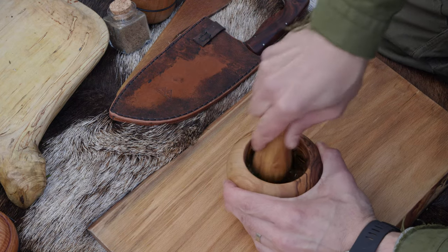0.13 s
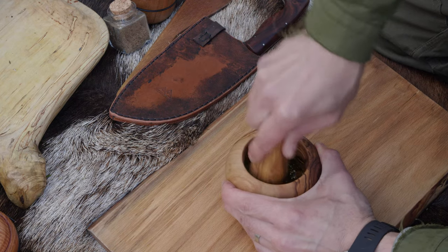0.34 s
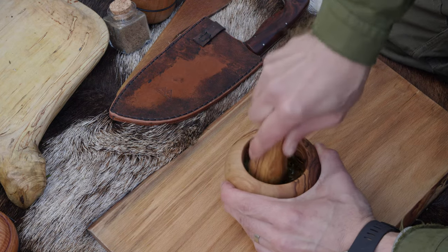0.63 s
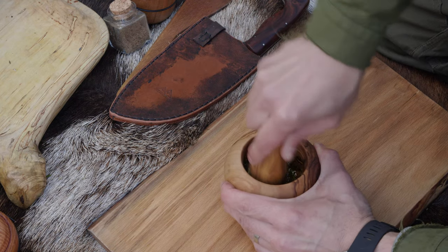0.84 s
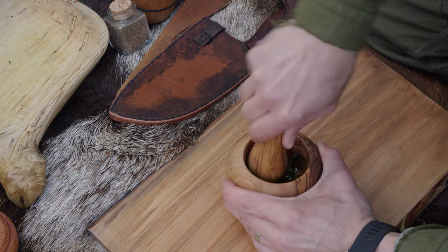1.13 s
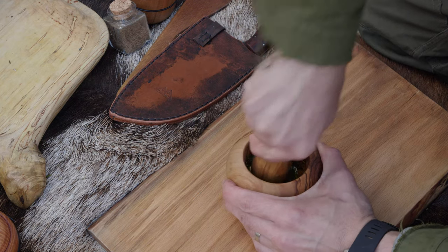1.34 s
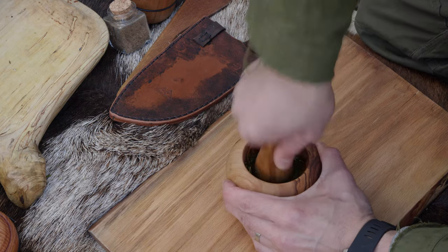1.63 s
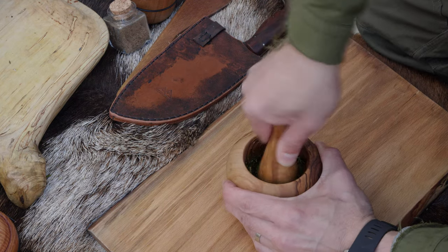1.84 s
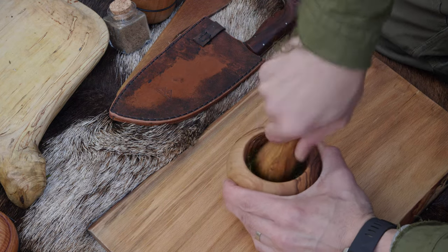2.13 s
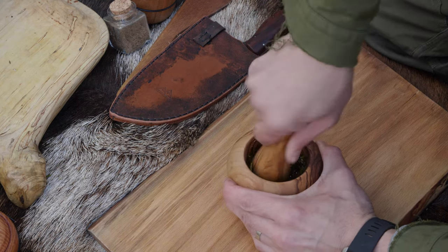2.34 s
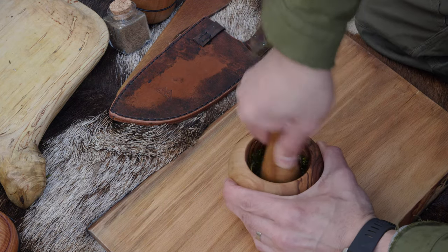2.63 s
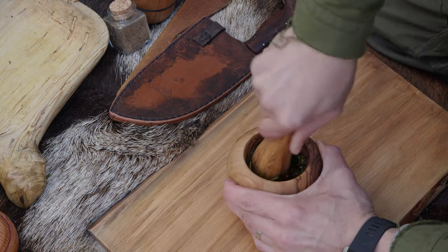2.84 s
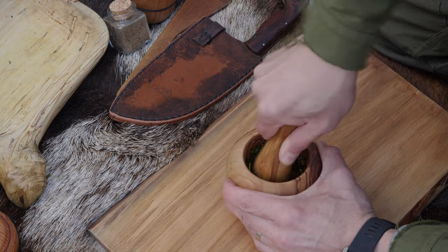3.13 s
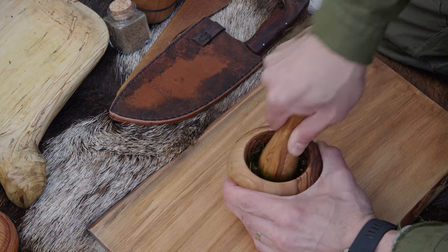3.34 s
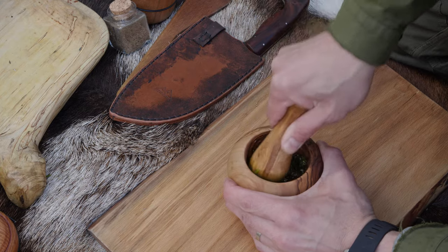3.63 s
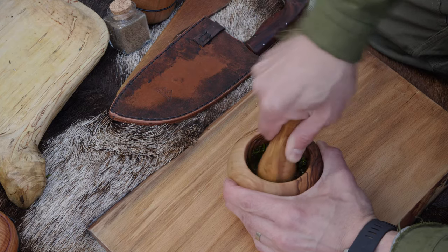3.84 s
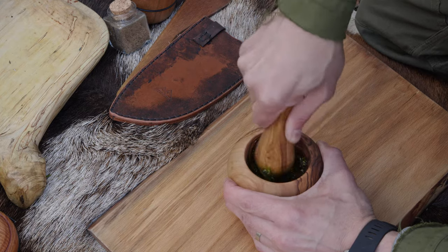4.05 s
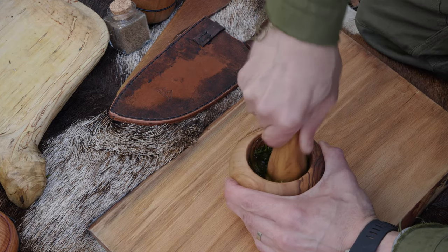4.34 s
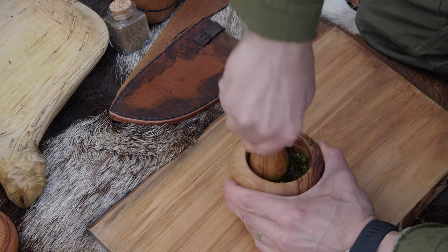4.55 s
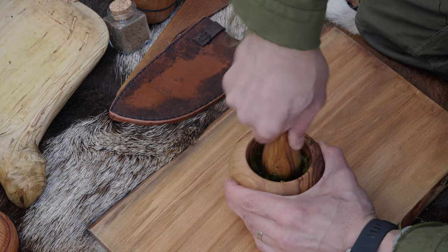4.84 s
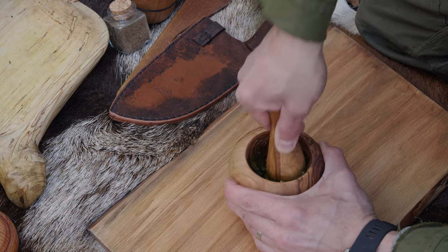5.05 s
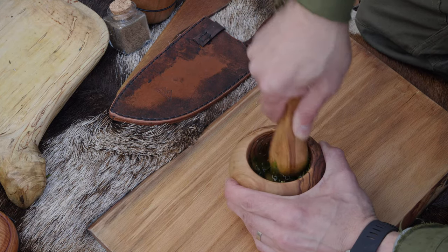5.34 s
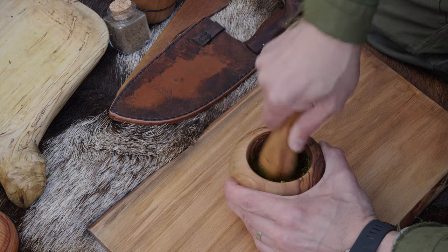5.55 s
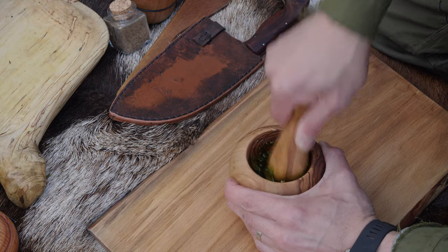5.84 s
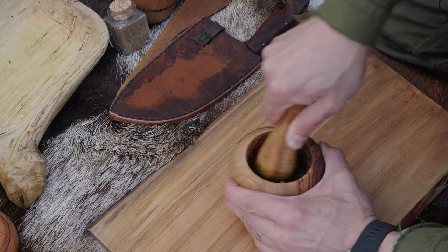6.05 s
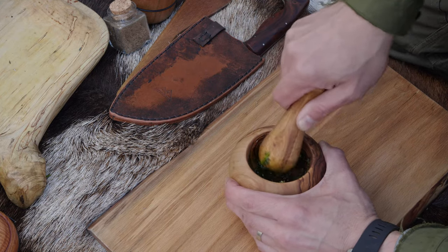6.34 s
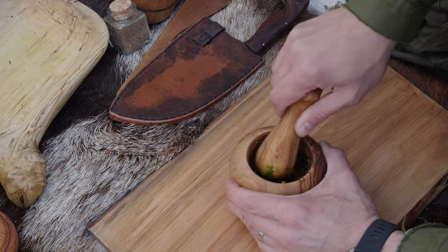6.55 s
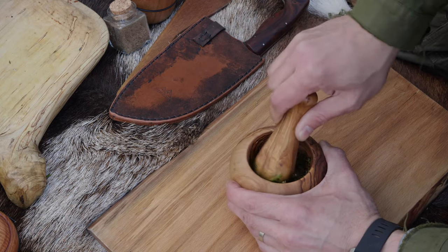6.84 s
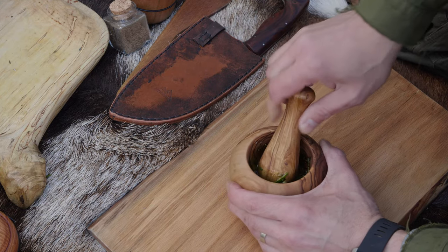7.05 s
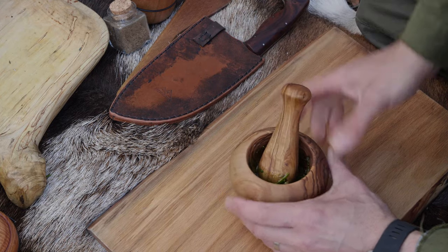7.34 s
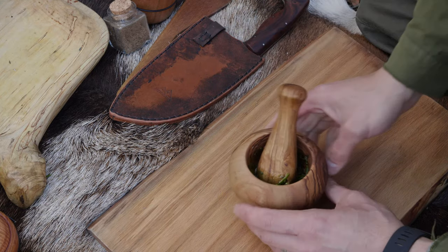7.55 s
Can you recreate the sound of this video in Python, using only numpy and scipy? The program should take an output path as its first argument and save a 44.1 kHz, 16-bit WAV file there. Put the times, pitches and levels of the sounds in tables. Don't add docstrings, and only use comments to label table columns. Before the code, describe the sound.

Short, dry, woody thuds and hollow bowl knocks come in uneven flurries, mixed with leaf crunch, stem snaps and tiny grit ticks. Rough grinding rumbles through the wood between hits. After several bursts and quieter rubbing, a heavy blow and then a bright double knock on the rim finish the work. Close stereo microphone outdoors, no room echo, soft steady airy hiss around it.

```python
import sys
import numpy as np
from scipy import signal
from scipy.io import wavfile

SR = 44100
rng = np.random.default_rng(int(sys.argv[2]) if len(sys.argv) > 2 else 0)


def digitize_waveform(pressure):
    field = np.atleast_2d(pressure).T
    bounded = np.clip(field, -1, 1)
    quanta = np.round(bounded * 32767).astype(np.int16)
    wavfile.write(sys.argv[1], SR, quanta)


def rack_gain(trim_db):
    fader = np.asarray(trim_db, float)
    return 10 ** (fader / 20)


N = 338685

# [f/Hz, level per Hz/dB]
AIR_COLOUR = [(15, -66), (25, -10.5), (87, -1), (245, -11), (410, -10.5), (445, -11.5), (584, -12.5),
              (902, -10.5), (1060, -15), (1780, -13), (4600, -25), (14400, -34.5), (16500, -22)]
# [f/Hz, likeness 0 to 1]
AIR_LIKENESS = [(28, 1.0), (60, 0.75), (240, 0.61), (950, 0.62), (3770, 0.46), (15000, 0.024)]
# [f/Hz, left over right/dB]
AIR_LEAN = [(28, -6), (60, -5.5), (240, -4.5), (950, -4.0), (3770, -5), (15000, -0.5)]

# [f/Hz, level/dB, t60/s]
THUD_MODES = [(161, -19, 0.13), (230, -2.5, 0.021), (247.5, 5, 0.039)]
BOARD_MODES = [(382.6, -1.5, 0.049), (432, -2.5, 0.016), (522, -6.5, 0.043)]
BOWL_MODES = [(635, -21, 0.058), (735, -0.5, 0.033), (750, -23, 0.0087)]
WALL_MODES = [(985, -6.5, 0.025), (1029, 0, 0.038)]
RIM_MODES = [(1296, -7.5, 0.04), (1426, -17, 0.063)]
EDGE_MODES = [(1500, 16, 0.0038), (1850, -4, 0.027), (2126, 6, 0.0072), (2570, -2, 0.0085)]
PESTLE_MODES = [(3500, -3, 0.013), (7800, -3, 0.012)]

# [t/s, push/dB, ring/dB, hardness/dB]
SHOVES = [(0.24, -40, -45.5, -3.5), (0.448, -39, -66, 0.5), (0.767, -33, -41, -8), (0.8711, -32, -38, -22),
          (1.0299, -44, -72, -3), (2.0138, -40, -41.5, -5.5), (2.2328, -58, -36, -10.5),
          (2.249, -63, -35.5, -4.5), (2.4362, -36.5, -62.5, 6), (2.583, -38, -41, -9),
          (2.6436, -34, -36, -2), (2.6712, -48, -45, -4), (3.2402, -44, -39, -9), (3.294, -41, -43, -5),
          (4.3213, -44, -72, 8), (4.3825, -41.5, -69, 5), (5.0319, -41, -61, 1), (5.4948, -48, -48, -1.5),
          (5.966, -27, -39.5, -7), (6.037, -38, -68, 5)]
# [t/s, push/dB, ring/dB, hardness/dB]
NUDGES = [(0.3437, -51, -32, -33), (0.6168, -37.5, -40.5, -28), (0.857, -47, -54, -17),
          (1.429, -74, -45.5, -3.5), (1.8282, -66, -42, -7), (1.9125, -50, -43.5, -22),
          (2.1638, -55, -43, -6), (2.338, -51, -49, -5), (2.602, -37, -63, -9), (2.7046, -77, -46, -8),
          (2.9571, -57, -46, -4), (3.26, -47, -44, -17), (3.329, -47.5, -52, -2), (4.0751, -54.5, -55, -23),
          (5.4675, -47, -47, -6), (5.5228, -43, -38.5, -5.5), (5.609, -47.5, -66, -8),
          (5.6247, -48, -61, -17), (6.013, -47, -69, 8), (6.0505, -52, -66, -5), (6.849, -56, -75, -16)]
# [t/s, push/dB, ring/dB, hardness/dB]
RAPS = [(0.1966, -40.5, -56.5, 9), (0.2923, -46, -49, -9), (0.2975, -24.5, -37.5, -8),
        (0.333, -43, -46, -7), (0.4952, -38.5, -48.5, -0.5), (0.5505, -36.5, -41, -6),
        (0.716, -43.5, -65, 5.5), (0.8242, -35.5, -42.5, -3.5), (0.98, -60, -59, 8),
        (2.1883, -30.5, -58, 7.5), (2.261, -41.5, -41, -11), (2.998, -44, -34, -5), (3.211, -46, -50, -1.5),
        (4.7825, -54, -60, -3), (5.1008, -42.5, -61, 3), (5.415, -34, -35.5, -14), (5.933, -50, -57, -1),
        (6.2504, -37.5, -43, -22)]
# [t/s, push/dB, ring/dB, hardness/dB]
BLOWS = [(0.171, -44, -57, 1), (0.4239, -46, -62, 4), (0.5796, -33.5, -34.5, -8.5), (1.316, -35, -54, 0),
         (3.026, -46, -60, -5), (3.0491, -29.5, -31, -7), (3.086, -71, -43.5, -5), (3.1289, -68, -49, -12),
         (4.624, -38.5, -50, -9), (5.3816, -44, -34.5, -6.5), (6.1918, -26.5, -24, -12.5),
         (7.1195, -52, -76, -13), (7.487, -54, -61, -6)]
# [t/s, push/dB, ring/dB, hardness/dB]
MORE_KNOCKS = [(2.196, -33, -44, -4), (2.216, -55, -47, -6), (2.593, -44, -50, -8), (2.609, -55, -62, -11),
               (2.648, -53, -51.5, 4), (2.676, -54, -58, -4), (5.4229, -39, -49, -12), (5.451, -46, -60, -10),
               (5.475, -44, -61, -10), (5.499, -46, -48, 0.5), (5.6, -39, -61, 0), (5.637, -47, -54, -10)]
# [thud/dB, board/dB, wall/dB]
KNOCK_LOSS = [
    (0.5, -11, -14.5),
    (-9, 3, -11.5),
    (-15, -0.5, -5),
    (1.5, 0, -3.5),
    (-5, -4.5, -10),
]

# [t/s, level/dB, brightness/dB]
STEMS = [(0.1961, -41, -4.5), (0.2824, -54, 2), (0.2957, -43, -1), (0.365, -48, -13), (0.881, -38, -8),
         (0.981, -42.5, -12), (1.312, -45, -2), (1.89, -52, -24), (2.473, -48.5, -17), (2.599, -54, 5),
         (2.643, -39.5, -18), (3.2027, -46, -21), (4.001, -48, -20), (4.618, -52, -11), (5.424, -58.5, 16),
         (5.523, -53, -14), (6.014, -45.5, -20), (6.506, -45, -22), (6.671, -44, -10), (6.683, -61, -21)]
# [t/s, level/dB, brightness/dB]
TICKS = [(0.127, -58, -11), (0.5009, -33.5, -8), (0.554, -40.5, 0), (0.5797, -50, -1), (0.7033, -44.5, 1),
         (0.868, -39.5, -9), (2.1615, -49, 4), (2.2, -58, -7), (2.7852, -54, -9), (2.794, -49.5, -8),
         (2.9967, -42.5, -2), (3.3274, -53, -12), (4.205, -55, 2), (4.286, -49, 2), (4.547, -35.5, 2),
         (4.788, -50, -2), (5.1014, -52, 4), (5.38, -67, -11), (5.477, -55, 5)]
# [t/s, level/dB, brightness/dB]
LEAVES = [(0.171, -45.5, -15), (0.238, -45.5, -7), (0.342, -41.5, -1), (0.8262, -46.5, -2),
          (1.429, -47, -4), (1.6813, -52, -8), (1.7826, -53, -2), (2.0094, -40.5, -10), (2.189, -43, -4),
          (2.233, -52, 10), (2.2489, -48, -10), (2.671, -53, -18), (3.0154, -68, 9), (3.048, -38.5, -3),
          (3.21, -57, -10), (3.2369, -37, -2), (4.443, -58, 9), (5.0144, -59, -10), (5.16, -56, -2),
          (5.932, -53, 6), (5.9576, -53, 2), (6.19, -43.5, 3), (6.847, -61, -4), (6.982, -48, 0)]
# [t/s, level/dB, middle/dB, brightness/dB]
CRACKLES = [(0.0273, -45, -4, -6), (0.0887, -52, -4, -6), (0.261, -42, -3, -6), (0.3934, -53, -3, -6),
            (0.401, -53, -5, -8), (0.425, -42, -9, -11), (0.4718, -46, -9, -6), (0.601, -56, -5, -6),
            (0.613, -45, -1, -6), (0.6274, -45.5, -5, -6), (0.6324, -49, -3, -6), (0.6679, -45, -13, -12),
            (0.7642, -43.5, -7, -10), (0.9148, -42, -9, -6), (0.9552, -44, -5, -6), (1.0196, -43, -8, -6),
            (2.217, -49, 1, -6), (2.385, -53, 0, -6), (2.4079, -56, -5, -6), (2.4309, -43.5, -2, -6),
            (2.5147, -48, -4, -6), (2.6104, -53, -5, -6), (2.6474, -40, -2, -11), (2.8464, -49, 0, 3),
            (2.9567, -60, -5, -6), (3.0214, -55, -3, -6), (3.055, -40, -14, -13), (3.083, -46, -4, -8),
            (3.126, -40, -5, -6), (3.2278, -53, -3, -2), (3.2574, -54, 3, -6), (3.2999, -43, -5, -11),
            (3.3144, -54, -5, -6), (3.3844, -50, -0.5, -9), (5.4969, -52, -11, -6), (5.6446, -45, -4, -11)]
# [t/s, level/dB, f/Hz]
POPS = [(0.0, -43, 244), (0.0, -44, 373), (0.001, -42, 737), (0.181, -41, 374), (0.2895, -31, 380),
        (0.289, -48, 530), (0.299, -41, 388), (0.499, -46, 2680), (0.501, -43.5, 720), (0.508, -42, 384),
        (0.553, -38, 240), (0.694, -51, 2000), (0.835, -44, 513), (0.872, -50, 2700), (4.632, -55, 393),
        (1.682, -49, 2070), (1.782, -53, 1900), (1.781, -51, 1310), (1.817, -46.5, 1400), (1.84, -50, 730),
        (2.0082, -46.5, 6500), (2.21, -44, 1350), (2.226, -49, 1900), (2.592, -44.5, 1340),
        (2.6, -52, 5400), (2.647, -41.5, 2970), (2.669, -49, 2800), (2.835, -45.5, 150),
        (2.999, -40.5, 2030), (3.054, -47, 2900), (3.114, -52, 1020), (3.231, -61, 760),
        (3.2375, -42.5, 6670), (3.239, -43, 2870), (3.983, -54, 4000), (4.208, -51, 170),
        (4.5465, -43, 1150), (5.035, -52, 4000), (6.193, -39, 546), (6.984, -58, 538), (6.5057, -46, 3530),
        (6.6702, -41, 3530), (6.682, -46, 3530)]

# [t/s, pressure/dB]
RUB = [(0, -65), (0.7, -62), (1.2, -65), (2.1, -59.5), (2.75, -58.5), (3.45, -66.5), (4.2, -74.5),
       (4.65, -79), (5.1, -54.5), (5.2, -108), (7.1, -94), (7.68, -80)]
# [t/s, length/s, wood rumble/dB, leaf crunch/dB]
TWISTS = [(0.037, 0.004, -42.5, -69.5), (0.256, 0.055, -40.5, -66.5), (0.876, 0.011, -42, -63.5),
          (1.022, 0.021, -46, -76), (1.242, 0.23, -59, -76), (1.642, 0.095, -70, -86),
          (1.75, 0.046, -65, -90), (1.822, 0.01, -43.5, -67), (2.143, 0.058, -50, -69.5),
          (2.197, 0.029, -39, -66.5), (2.228, 0.014, -35, -62), (2.253, 0.025, -40, -64.5),
          (2.554, 0.058, -42, -69.5), (2.82, 0.05, -61, -75), (2.993, 0.057, -40.5, -67.5),
          (3.19, 0.053, -52, -75), (3.29, 0.077, -45.5, -78), (4.241, 0.079, -53.5, -68.5),
          (4.374, 0.084, -47.5, -68), (4.756, 0.065, -50, -73), (4.82, 0.095, -84, -73.5),
          (4.926, 0.2, -81, -72), (5.407, 0.037, -39.5, -74), (5.457, 0.024, -42.5, -69),
          (5.495, 0.017, -34, -63), (5.599, 0.056, -44, -75.5), (5.94, 0.029, -51, -64),
          (6.005, 0.064, -44, -74.5), (7.325, 0.47, -83, -78)]
# [t/s, length/s, wood rumble/dB, leaf crunch/dB, crunch centre f/Hz]
DRAGS = [(0.072, 0.075, -90, -71, 3860), (0.192, 0.011, -40.5, -61, 3750), (0.364, 0.012, -50, -67, 3920),
         (0.404, 0.029, -82, -63, 3900), (0.464, 0.054, -46, -64.5, 3780), (0.537, 0.13, -50, -76, 5200),
         (0.545, 0.014, -68, -59.5, 5100), (0.671, 0.047, -70, -64.5, 4530), (0.772, 0.033, -50, -73, 3900),
         (0.819, 0.026, -40, -68, 4100), (0.915, 0.039, -47, -67, 4080), (1.184, 0.031, -77, -68, 3900),
         (1.962, 0.098, -81, -76, 5100), (2.29, 0.11, -54.5, -72, 3800), (2.639, 0.017, -41.5, -55.5, 4960),
         (2.645, 0.019, -43, -64, 6260), (2.66, 0.091, -51, -65.5, 3900), (3.039, 0.0082, -58, -63, 9000),
         (3.107, 0.037, -42.5, -64.5, 3920), (3.851, 0.16, -53.5, -67.5, 4350),
         (4.538, 0.15, -51, -71.5, 5300)]

# [f/Hz, level/dB, t60/s]
LIP_LOW = [(208, -7, 0.037), (236, -6, 0.06), (373, -0.5, 0.053), (476, -10, 0.033), (537, 1, 0.052),
           (644, -14, 0.066)]
LIP_WALL = [(736, -4, 0.037), (1010, 0.5, 0.025), (1230, -1.5, 0.015)]
LIP_HIGH = [(1475, 2.5, 0.011), (1720, 1.5, 0.01), (2020, -6, 0.0079), (2400, -18, 0.019)]
LIP_TOP = [(3530, -3, 0.018), (3520, 12, 0.022), (4700, -7, 0.0078)]
# [t/s, push/dB, wall/dB, contact/dB, direction +1 or -1]
LIP_KNOCKS = [
    (6.506, -61, -60, -27.5, 1),
    (6.5063, -27.5, -16.5, -21.5, 1),
    (6.5127, -42, -26.5, -32.5, 1),
    (6.5170, -42, -35, -58, 1),
    (6.5264, -40, -41, -60, 1),
    (6.6707, -28, -47, -21.5, -1),
    (6.6725, -27, -21.5, -26, -1),
    (6.6764, -44, -39, -43, -1),
    (6.6821, -27, -19, -28.5, 1),
    (6.9844, -26.5, -31.5, -40, 1),
]
# [f/Hz, level/dB, t60/s]
FLANK_MODES = [(260, -13.5, 0.081), (406, -10.5, 0.047), (557, -12.5, 0.043), (723, 1, 0.034),
               (1015, -0.5, 0.031), (1330, -11, 0.03)]
# [t/s, level/dB]
FLANK_KNOCKS = [
    (4.2079, -28.5),
    (4.213, -46),
    (4.549, -17),
]
# [f/Hz, level/dB, t60/s]
SING_LOW = [(3400, -4, 0.02), (3720, 0, 0.018)]
SING_HIGH = [(7600, -2, 0.011), (7980, -2, 0.01)]
# [t/s, low song/dB, high song/dB]
FLICKS = [(4.207, -65, -51), (4.548, -43, -34), (5.38, -72, -55), (5.407, -62, -60), (5.4145, -56, -62),
          (5.427, -48, -54), (5.466, -58, -66), (2.634, -61, -52), (2.675, -56, -52), (6.671, -38, -42),
          (6.682, -49, -55)]


def rms_one(x):
    return x / np.sqrt(np.mean(x ** 2) + 1e-20)


def at_hz(points, hz):
    table_hz, values = np.transpose(points)
    return np.interp(np.log(hz), np.log(table_hz), values)


def low_pass(x, hz):
    return signal.sosfilt(signal.butter(4, hz, fs=SR, output="sos"), x)


def high_pass(x, hz, order=2):
    return signal.sosfilt(signal.butter(order, hz, "high", fs=SR, output="sos"), x)


def band(x, low_hz, high_hz):
    edges = [low_hz, min(high_hz, 0.45 * SR)]
    return signal.sosfilt(signal.butter(2, edges, "band", fs=SR, output="sos"), x)


def top_cut(x, hz=16200):
    return signal.sosfilt(signal.cheby2(14, 45, hz, fs=SR, output="sos"), x)


def drift(rate):
    r = np.exp(-80 * np.pi * rate / SR)
    noise = rng.standard_normal(N // 40 + 2002)
    slow = signal.lfilter([1], [1, -2 * r, r * r], noise)[2000:]
    return np.interp(np.arange(N) / 40, np.arange(len(slow)), rms_one(slow))


def ring(force, hz, t60):
    r = rack_gain(-60 / (t60 * SR))
    w = 2 * np.pi * hz / SR
    return signal.lfilter([0, np.sin(w)], [1, -2 * r * np.cos(w), r * r], force + 1e-18)


def grains(per_s, spread_db):
    sizes = rack_gain(spread_db * np.minimum(rng.exponential(1, N), 5)) * rng.choice([-1, 1], N)
    return sizes * (rng.random(N) < per_s / SR)


def strike(modes, at, level_db, contact_hz, scatter_db):
    out = np.zeros(N)
    luck = rng.standard_normal((len(at), len(modes)))
    for k, (hz, db, t60) in enumerate(modes):
        clicks = np.zeros(N)
        clicks[at] = rack_gain(level_db + db + scatter_db * luck[:, k])
        out += ring(clicks, hz, t60)
    return signal.sosfilt(signal.bessel(4, contact_hz, fs=SR, output="sos", norm="mag"), out)


def air():
    out = 0
    together = drift(1.0)
    edges = 24 * 2 ** np.arange(0, 9.6, 0.5)
    white = rng.standard_normal((2, 2, N))
    for k, (low, high) in enumerate(zip(edges, edges[1:])):
        mid, side = band(white[k % 2], low, high)
        hz = np.sqrt(low * high)
        alike = np.clip(at_hz(AIR_LIKENESS, hz) - 0.1, -0.5, 1)
        lean = rack_gain(at_hz(AIR_LEAN, hz) / 2)
        gain = rack_gain(at_hz(AIR_COLOUR, hz) + 0.4 * together + 0.9 * drift(12.4))
        stereo = np.sqrt(1 + alike) * mid + np.sqrt(1 - alike) * side * [[1], [-1]]
        out = out + gain * stereo * [[lean], [1 / lean]]
    return rack_gain(-56.5) * rms_one(top_cut(out))


def pops():
    out = np.zeros(N)
    t = np.arange(6000) / SR
    for s, db, hz in POPS:
        swell = 1 - np.exp(-t * hz)
        t60 = 10.3 / hz + 0.0092
        i = max(int(s * SR), 0)
        out[i:i + 6000] += swell * rack_gain(db + 8 - 60 * t / t60) * np.sin(2 * np.pi * hz * t)
    return out


def snaps():
    crackle_db = -7
    # t/s, low/dB, middle/dB, high/dB
    rows = [(s, db, db - 9, db + top) for s, db, top in STEMS]
    rows += [(s, db - 11, db, db + top) for s, db, top in TICKS]
    rows += [(s, db, db, db + top) for s, db, top in LEAVES]
    for s, db, middle, top in CRACKLES:
        level = db + crackle_db
        rows.append((s, level, level + middle, level + top))

    out = np.zeros(N)
    t = np.arange(600) / SR
    fade = rack_gain(-60 * t / 0.0055) * np.minimum(t / 0.0003, 1)
    (low_hz, _, low_t60), (high_hz, _, high_t60) = PESTLE_MODES
    for s, low_db, middle_db, high_db in rows:
        burst = rng.standard_normal(600) * fade
        low = band(band(burst, 2900, 5600), 2600, 6000) + 0.008 * ring(burst, low_hz, low_t60)
        middle = band(band(burst, 7060, 9000), 6500, 10500) + 0.035 * ring(burst, high_hz, high_t60)
        parts = [(low, low_db),
                 (band(burst, 5200, 7200), (low_db + middle_db) / 2 - 4),
                 (middle, middle_db),
                 (band(burst, 9000, 15000), high_db)]
        snap = sum(rack_gain(db + 4.0) * part / np.abs(part).max() for part, db in parts)
        i = int((s + 0.0007) * SR)
        out[i:i + 600] += snap[:N - i]
    return out


def lip_knocks():
    s, push_db, wall_db, contact_db, way = np.transpose(LIP_KNOCKS)
    lip = np.zeros(N)
    for sign in (-1, 1):
        these = way == sign
        at = (s[these] * SR).astype(int)
        late = at + int(0.0005 * SR)
        lip += sign * (strike(LIP_LOW, late, push_db[these], contact_hz=800, scatter_db=1.5)
                       - strike(LIP_WALL, at, wall_db[these], contact_hz=1500, scatter_db=1.5)
                       - strike(LIP_HIGH, at, contact_db[these], contact_hz=2150, scatter_db=5.0))
    top = strike(LIP_TOP, (s * SR).astype(int), contact_db - 21, contact_hz=7000, scatter_db=1.5)
    return low_pass(lip, 2400) + band(top, 4230, 5600)


def flank_knocks():
    s, db = np.transpose(FLANK_KNOCKS)
    wall = strike(FLANK_MODES, (s * SR).astype(int), db, contact_hz=1200, scatter_db=1.0)
    return band(wall, 357, 1270)


def pestle_song():
    s, low_db, high_db = np.transpose(FLICKS)
    at = (s * SR).astype(int)
    low = strike(SING_LOW, at, low_db, contact_hz=9000, scatter_db=2.0)
    high = strike(SING_HIGH, at, high_db, contact_hz=14000, scatter_db=5.0)
    return band(low, 2500, 3850) + band(high, 7000, 9600)


def wood_rumble(grit):
    parts = [(THUD_MODES, -3.0), (BOARD_MODES, 0.0), (BOWL_MODES, -1.5),
             (WALL_MODES, -8.0), (RIM_MODES, -11.0), (EDGE_MODES, -13.0)]
    out = np.zeros(N)
    for modes, part_db in parts:
        for k, (hz, db, t60) in enumerate(modes):
            out += rack_gain(db + part_db) * ring(grit, hz, t60) * (-1) ** k
    return rms_one(out)


def grinding():
    t = np.arange(N) / SR
    stutter = rack_gain(3.2 * drift(35))
    wood = wood_rumble(grains(900, spread_db=2.5) * stutter)
    cracks = grains(3500 * rack_gain(2.5 * drift(60)), spread_db=3.8) * np.sqrt(stutter)
    powder = grains(9000 * rack_gain(3.5 * drift(57)), spread_db=3.6) * np.sqrt(stutter)
    dust = rms_one(band(band(powder, 2300, 17800), 2300, 14000))
    patches = rack_gain(2.0 * drift(20))
    edges = np.geomspace(1500, 12000, 9)
    flakes = sum(rack_gain(1.6 * drift(25)) * band(cracks, low, high) for low, high in zip(edges, edges[1:]))

    rub_crunch = rack_gain(-11) * rms_one(band(flakes, 1670, 7600))
    out = rack_gain(np.interp(t, *np.transpose(RUB))) * (wood + rub_crunch)

    strokes = [(*row, 4260, row[3] + 2) for row in TWISTS]
    strokes += [(*row, row[3] - 8) for row in DRAGS]
    for s, length, wood_db, crunch_db, hz, dust_db in strokes:
        start, end = s - 0.012, s + length + 0.0035
        now = slice(max(int(start * SR), 0), min(int(end * SR), N))
        pressure = np.abs(np.sin(np.pi * (t[now] - start) / (end - start))) ** 0.46
        squeak = band(band(cracks[now], 0.88 * hz, 1.143 * hz), 0.88 * hz, 1.143 * hz)
        broad = band(band(flakes[now], 0.48 * hz, 1.95 * hz), 0.45 * hz, 2.1 * hz)
        leaves = rms_one(squeak * patches[now] + 1.4 * broad)
        out[now] += pressure * (rack_gain(wood_db - 8.5) * rms_one(wood[now])
                                + rack_gain(crunch_db + 6.0) * leaves
                                + rack_gain(dust_db + 1.5) * dust[now])
    return top_cut(out)


def knocks():
    rows = []
    for kind, (thud, board, wall) in zip([SHOVES, NUDGES, RAPS, BLOWS, MORE_KNOCKS], KNOCK_LOSS):
        for s, push, ring_db, hard in kind:
            rows.append((s, push + thud, push + board, ring_db, ring_db + wall, ring_db + hard))
    s, thud_db, board_db, bowl_db, wall_db, rim_db = np.transpose(rows)
    at = (s * SR).astype(int)
    late = at + int(0.00057 * SR)
    edge_db = rim_db + 0.7 * np.minimum(rim_db - bowl_db, 4)
    wood = (strike(THUD_MODES, late, thud_db - 6.0, contact_hz=506, scatter_db=2.0)
            + strike(BOARD_MODES, late, board_db + 1.5, contact_hz=640, scatter_db=3.0)
            - strike(BOWL_MODES, at, bowl_db + 5.0, contact_hz=945, scatter_db=1.0)
            - strike(WALL_MODES, at, wall_db + 2.5, contact_hz=1250, scatter_db=1.2)
            + strike(RIM_MODES, at, rim_db + 0.5, contact_hz=1730, scatter_db=4.5)
            - strike(EDGE_MODES, at, edge_db - 0.5, contact_hz=2140, scatter_db=3.5))
    pestle = strike(PESTLE_MODES, at, edge_db - 2.5, contact_hz=5000, scatter_db=2.5)
    return low_pass(wood, 2800) + pestle


def scene():
    shaft = lip_knocks() + flank_knocks() + pestle_song()
    work = high_pass(knocks() + shaft + snaps() + grinding() + pops(), 135, order=4)
    apart = 0.58 * high_pass(np.roll(work, 11), 11000) + 0.015 * np.roll(work, 40)
    apart += 0.092 * high_pass(work, 2500)
    return work - apart * [[1], [-1]] + air()


def band_limit(x):
    return signal.sosfilt(signal.butter(12, 16830, fs=SR, output="sos"), x)


def record(dry):
    mix = top_cut(high_pass(dry, 60), 16700)
    return band_limit(mix)


dry = scene()
out = record(dry)
digitize_waveform(out)
```